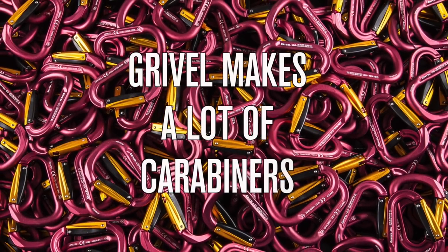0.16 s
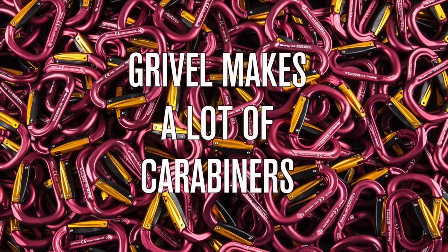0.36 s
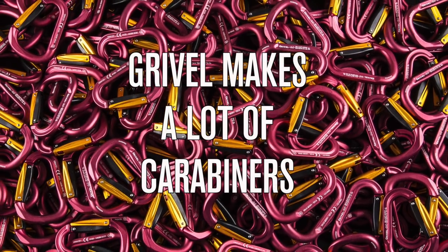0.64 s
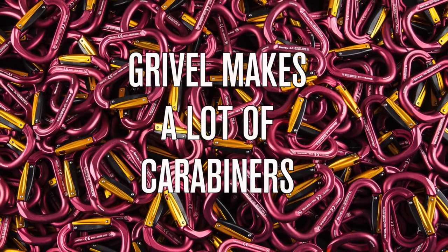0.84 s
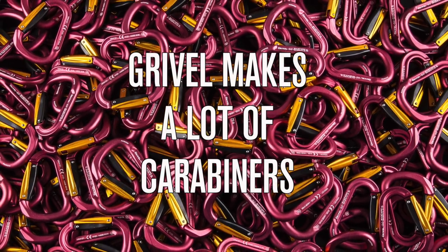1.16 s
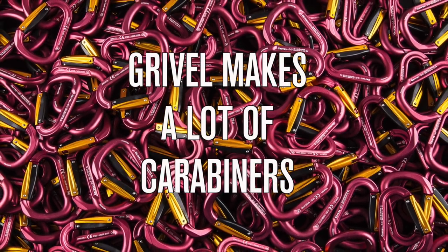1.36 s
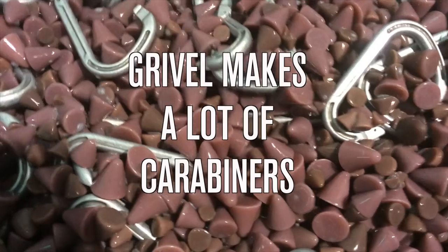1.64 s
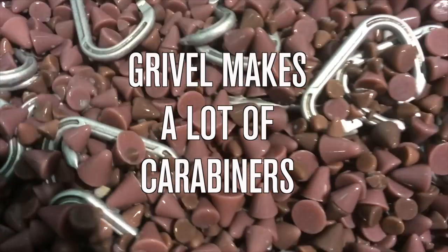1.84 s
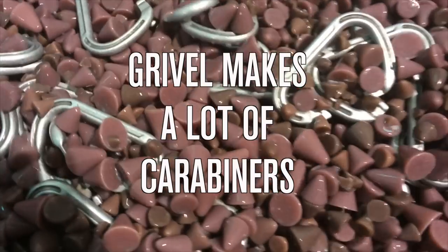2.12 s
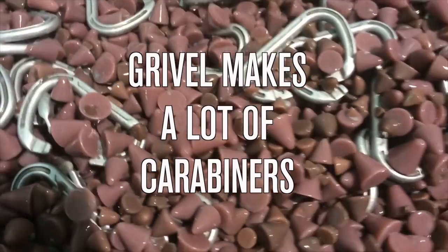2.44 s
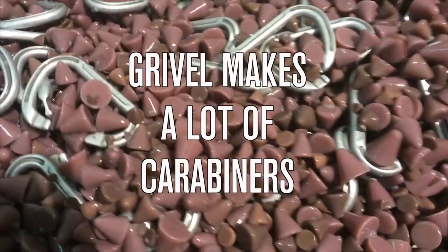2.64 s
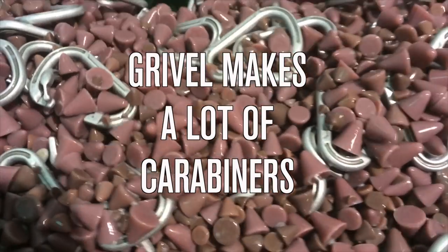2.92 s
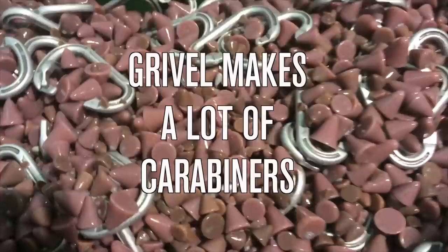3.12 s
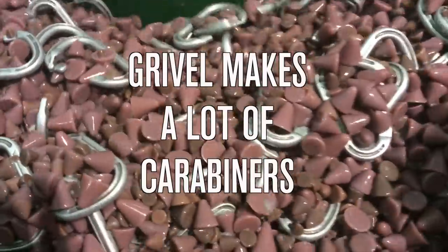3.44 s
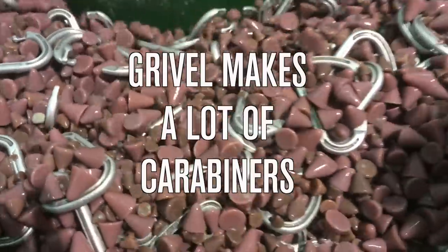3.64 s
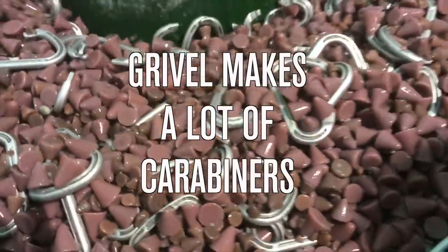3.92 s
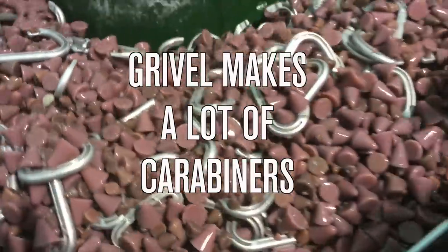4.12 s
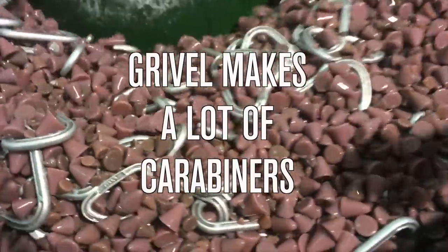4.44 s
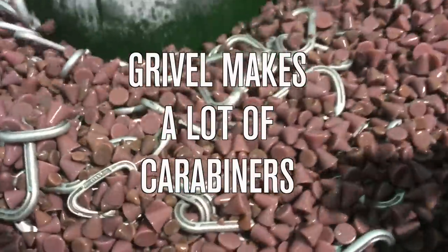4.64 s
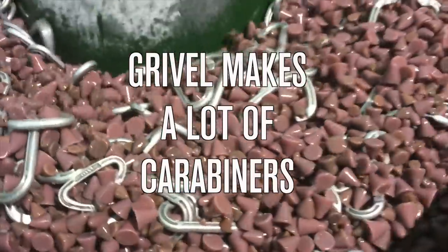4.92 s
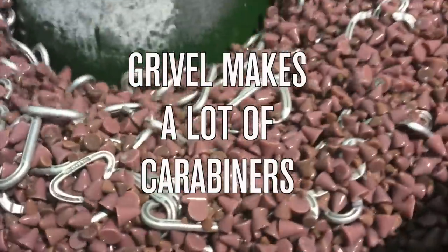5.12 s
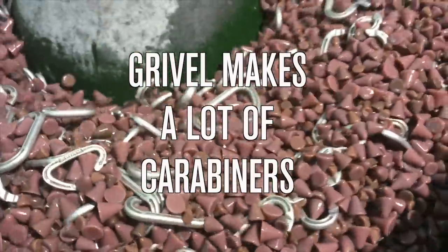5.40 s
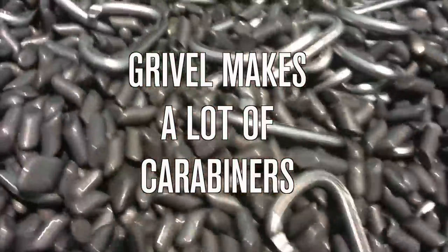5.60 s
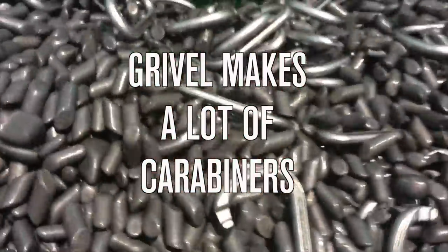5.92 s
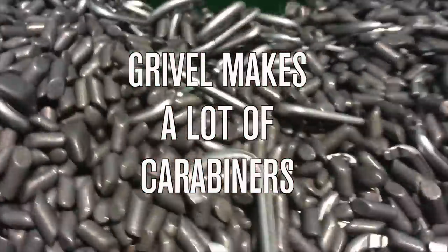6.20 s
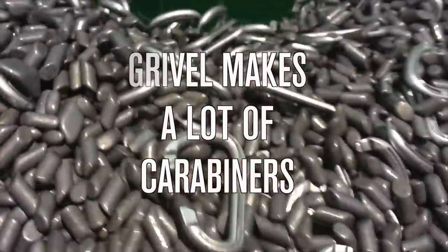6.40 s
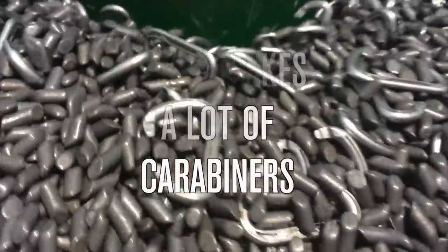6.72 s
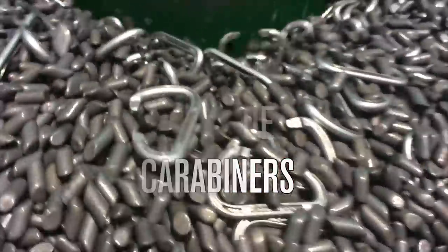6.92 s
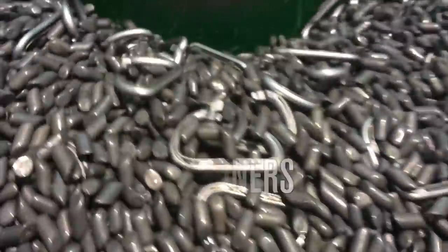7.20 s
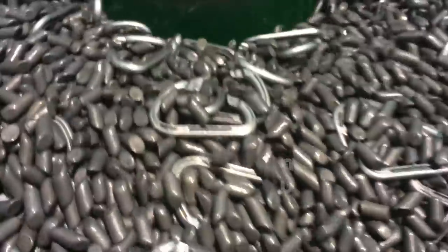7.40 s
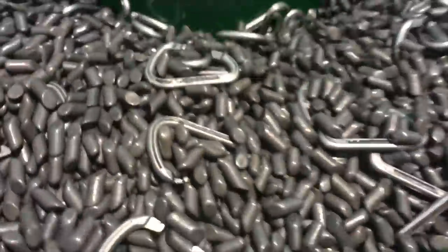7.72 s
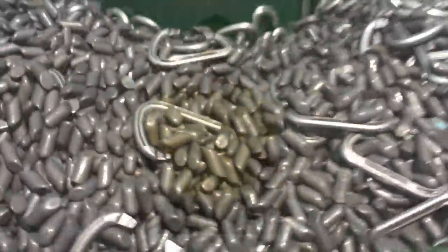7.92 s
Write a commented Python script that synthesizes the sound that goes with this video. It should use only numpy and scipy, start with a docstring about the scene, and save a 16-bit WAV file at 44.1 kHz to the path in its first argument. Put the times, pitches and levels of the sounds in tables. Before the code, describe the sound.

Small stones and aluminium hooks churn in a shaking machine with a dense clattering rush over low droning hum, then a closer, louder, crisper one.

```python
"""A factory hall: two vibratory finishing bowls, heard one after the other on a mono microphone, the second closer.
A spinning eccentric shakes each bowl about twenty times a second: the stone media rattle in a throbbing rush of
clicks, short clacks and noise, and the aluminium hooks among them ring at fixed high modes under random blows.
The first bowl adds a droning frame and a beating hum. Dull bumps near the microphone come with the second,
and filtered noise makes the low rumble of the hall behind both."""
import sys
import numpy as np
from scipy import signal
from scipy.fft import rfft, irfft, next_fast_len
from scipy.io import wavfile
from scipy.ndimage import uniform_filter1d

SR = 44100
rng = np.random.default_rng(int(sys.argv[2]) if len(sys.argv) > 2 else 0)


def transcribe(u):
    """Save the signal u as a 16-bit wav file named by the first command-line argument.

    u: samples, shape (n,) or (channels, n), limited to [-1, 1]; the rate is SR.
    q: integer samples, one column per channel.
    """
    v = np.clip(np.atleast_2d(u).T, -1, 1)
    q = np.round(v * 32767).astype(np.int16)
    wavfile.write(sys.argv[1], SR, q)


N = 355225  # length in samples

# Shake of each bowl. Each row, one a bowl: shakes per second [Hz], time of one loudest moment [s].
SHAKES = [(22.39, .088), (20.205, 5.530)]
# Colour of the rattling media, one list a bowl. Each row: frequency [Hz], level [dB per Hz].
MEDIA_SPECTRA = [
    [(200, -39), (345, -14), (560, -8.5), (800, -5.5), (1450, -4.5), (1680, -2.5), (1950, -6), (2400, -6),
     (3200, -2.5), (4800, -3.5), (7000, -6.5), (9600, -10), (12300, -15), (13300, -17), (15300, -27)],
    [(200, -28), (350, -16), (500, -5.5), (800, -9), (1000, -4.5), (1600, -2.5), (2350, -5.5), (2800, -5),
     (3200, -1.5), (4100, -1.5), (6700, 0), (10300, -4), (12300, -8.5), (14000, -8), (15200, -22)],
]
# Throb of the rush with the shake, one list a bowl; the treble comes as the load lands and slides.
# Each row: frequency [Hz], depth to either side [dB], lag behind the loudest moment [s].
THROBS = [
    [(600, 0.5, 0.012), (1100, 1, -0.026), (2100, 1, 0.011), (2900, 1.06, -0.0071), (5470, 1.47, .002),
     (8700, 1.2, 0.0071), (14000, 0, 0.0064)],
    [(450, 4, 0.0071), (750, -1, 0.0031), (1540, 3, -0.0032), (2220, 1.5, 0.0044), (3320, 2.5, -0.0048),
     (6500, 1.45, 0.0034), (13000, 1.5, .014)],
]
# Level of the media rush: one value a bowl [dB].
RUSH_LEVELS_DB = [-39.5, -37]
# Heaps of media slump and the rush swells or dips briefly. Each row: time [s], change of level [dB].
MEDIA_SLUMPS = [(1.3, 1), (1.88, 3.5), (2.09, 3), (2.26, 3), (2.44, 1), (2.68, 1.5), (3.58, 0.5),
                (3.71, -1.5), (4.68, -3), (6.72, 0), (7.45, 2.5)]
# Mode pitches of the hooks, one list a bowl [Hz].
HOOK_PITCHES_HZ = [
    [1344, 4566, 4846, 7364, 7430, 8170, 8669, 9120, 9670, 10330, 10581, 10950, 11655, 12703, 12790, 13700,
     13920, 14120, 14531, 15269],
    [4260, 4808, 7086, 7322, 9134, 11686, 12596, 13438, 13982, 15261],
]
# The same modes, one list a bowl. Each row: spread of pitch among the hooks [Hz], relative level [dB].
HOOK_MODES = [
    [(5, -11), (30, -4.5), (20, -6.5), (30, 0.5), (30, -2.5), (40, -13.5), (35, -2), (30, -19), (40, -24),
     (40, -27), (80, -10.5), (54, -18), (15, -7), (20, -9.5), (61, -13), (50, -21), (60, -15), (50, -19),
     (50, -11), (40, -16)],
    [(60, -7), (5, -11), (70, -4), (15, -1.5), (55, -3), (35, -4.5), (110, -3.5), (70, -14), (30, -10),
     (50, -24)],
]
# Ring of the hooks as they surface and sink, one list a bowl. Each row: time [s], level [dB].
HOOK_LEVELS = [
    [(0, -46), (.7, -47), (1.7, -44), (2.1, -45), (2.6, -43), (3.2, -47), (3.7, -44), (4.2, -47),
     (5.3, -44.5)],
    [(5.6, -43), (6, -41), (7.2, -43.5), (7.6, -41.5)],
]
# Modes of the first bowl's frame. Each row: frequency [Hz], width of each pass [Hz], relative level [dB].
FRAME_MODES = [(102.3, 8.1, 0.5), (117.9, 16, -3), (174.6, 44, -0.5), (193.6, 14, -7.5)]
# The load lurches and the machine throbs louder, or now and then softer.
# Each row: time [s], swell of the hum [dB], swell of the frame [dB].
LOAD_LURCHES = [(.23, 15, 8.5), (0.679, 8.5, 2), (.84, 10, 6), (.93, 10, 6), (1.05, 7, -1), (1.42, 14, 7.5),
                (2.1, -4, -5), (2.26, 11, 3), (2.4, 7, 5), (2.55, 11, 6), (2.62, 7, 3), (2.829, 7, 4),
                (3.04, 10, 5), (3.281, 7, 1), (3.63, 11, 4), (3.8, 13, 6), (4.07, 12, 8), (4.5, 7, 7),
                (4.68, 7, 8), (4.88, 7, 1), (5.27, 13, 5)]
# Dull bumps near the microphone. Each row: time [s], peak level [dB], frequency [Hz], length [cycles].
MIC_BUMPS = [(5.58, -42, 171, 10), (5.679, -36, 168, 3.7), (5.79, -43, 70, 1.5), (5.873, -36, 450, 0.92),
             (5.93, -45, 190, 2.6), (5.941, -33.5, 590, 1.9), (6.125, -39, 600, 2.4), (6.19, -37, 640, 2.7),
             (6.197, -44, 95, 2.2), (6.2335, -30, 250, 0.35), (6.848, -42, 168, 4.3), (7.151, -48, 90, 2.2),
             (7.26, -49, 110, 4), (7.27, -45, 170, 4), (7.411, -46, 155, 5), (7.511, -48, 166, 5),
             (6.77, -47, 141, 6.1), (7.08, -48, 150, 4), (7.988, -49, 93, 4.4), (7.77, -40, 546, 3.5)]
# Colour of the hall's low rumble. Each row: frequency [Hz], relative level [dB per Hz].
HALL_SPECTRUM = [(15, -55), (25, -15.5), (97, 4), (129, -1.5), (152, 1.5), (188, 0), (226, -3.5), (295, -8),
                 (385, -13), (450, -7.5), (580, -18.5), (990, -120)]
# Level of the low rumble along the take. Each row: time [s], level [dB].
HALL_LEVELS = [(0, -51.5), (5.5, -52), (6.0, -55.5), (6.6, -56.5), (6.9, -57.5), (7.2, -53.5), (7.5, -56),
               (7.65, -58.5), (8.05, -57)]

CHANGE_S, CROSSFADE_S = 5.518, 0.021  # middle and length of the change to the closer bowl
FADE_IN_S, FADE_IN_DB = 0.78, -4  # the sound rises from this much below its level
SLUMP_S, LURCH_S = 0.0076, 0.045  # half lengths of the bell-shaped swells
PART_Q = 240  # ring width = pitch / Q: high modes die sooner
FRAME_DB = -57
JOLT_DB = 25.5  # blow of a lurch on the frame, over its steady push; the frame's swell in dB is added
HUM_HZ, HUM_DB = 71.1, -60.5
BEAT_S, BEAT_LOW_S, BEAT_SHARE = 2.01, 1.57, 0.29  # beat period, one quietest moment, share of the second tone
EDGE_HZ = 15325  # upper band limit


def media(bowl):
    """Dense clicks and clacks over a smooth wash, throbbing with the shake, in drifting patches."""
    wash = evened(rng.standard_normal(N))
    clicks = evened(impacts(count=50000, spread_db=-2.0))
    rattle = evened(wash + amp(-8.5) * clicks + 0) * np.sqrt(np.mean((wash + amp(-8.5) * clicks) ** 2))
    rattle = rattle + amp([-10, -8][bowl]) * evened(clacks())
    hz, t, bands = signal.stft(rattle, SR, nperseg=256, noverlap=192)

    rate, peak_s = SHAKES[bowl]
    lag = read(THROBS[bowl], hz, axis=2)[:, None]
    depth_db = read(THROBS[bowl], hz)[:, None]
    throb_db = depth_db * np.cos(2 * np.pi * rate * (t - peak_s - lag))

    # patches are smoothed over 6 frequency bins, then over 40 frames
    patches = uniform_filter1d(rng.standard_normal(bands.shape), 6, 0)
    patches = evened(uniform_filter1d(patches, 40, 1))
    surge = np.interp(t, np.arange(N) / SR, wander(0.015))  # heaps of media slide together
    bands = bands * amp(throb_db + 0.49 * patches + 0.17 * surge)

    rush = signal.istft(bands, SR, nperseg=256, noverlap=192)[1][:N]
    rush = coloured(rush, MEDIA_SPECTRA[bowl])
    level_db = RUSH_LEVELS_DB[bowl] + bells(MEDIA_SLUMPS, SLUMP_S) + 0.19 * wander(0.082)
    return evened(rush) * amp(level_db)


def clacks():
    """Single stones of many sizes, each a short ring; small stones ring higher and die sooner."""
    total = np.zeros(N)
    for hz in np.geomspace(700, 7000, num=36):
        total += evened(resonate(impacts(count=250, spread_db=-0.5), hz, hz / 24))
    return total


def parts(bowl):
    """Three hooks of slightly different pitch ring under their own blows and swell as they surface and sink."""
    ring = np.zeros(N)
    for hz, (spread, db) in zip(HOOK_PITCHES_HZ[bowl], HOOK_MODES[bowl]):
        surfacing = amp(1.4 * wander(0.37))
        for side in (-.5, 0, .5):
            blows = surfacing * impacts(count=2500, spread_db=3.0) * amp(2.2 * wander(.07))
            ring += amp(db) * evened(resonate(blows, hz + side * spread, hz / PART_Q))
    return evened(ring) * amp(follow(HOOK_LEVELS[bowl]))


def frame():
    """The sprung frame of the first bowl drones at a few low modes, steeper for being coupled twice."""
    push = rng.standard_normal(N)
    for s, _, swell_db in LOAD_LURCHES:
        push[round((s - LURCH_S) * SR)] += amp(JOLT_DB + swell_db)
    drone = np.zeros(N)
    for hz, width, db in FRAME_MODES:
        once = resonate(push, hz, width)
        drone += amp(db) * evened(resonate(once, hz, width))
    return evened(drone) * amp(FRAME_DB + bells(LOAD_LURCHES, LURCH_S, axis=2))


def hum():
    """A near-sine whose pitch drifts a little; it beats slowly like two close tones and swells with each lurch."""
    turns = np.cumsum(HUM_HZ + 2.49 * wander(0.081)) / SR
    beat_turns = (np.arange(N) / SR - BEAT_LOW_S) / BEAT_S
    beat = abs(1 - BEAT_SHARE * np.exp(2j * np.pi * beat_turns))
    level_db = HUM_DB + bells(LOAD_LURCHES, LURCH_S) + 2.0 * wander(0.058)
    return np.sqrt(2) * np.sin(2 * np.pi * turns) * beat * amp(level_db)


def bumps():
    """Dull bumps close to the microphone, each a few cycles under a smooth bell."""
    reach = SR // 20
    out = np.zeros(N)
    for s, db, hz, cycles in MIC_BUMPS:
        turns = np.arange(-reach, reach) / SR * hz
        bell = np.exp(-(3 * turns / cycles) ** 2)
        start = round(s * SR) - reach
        out[start:start + 2 * reach] += amp(db) * np.cos(2 * np.pi * turns) * bell
    return out


def hall():
    """Lumpy low rumble of the workshop: coloured noise of wandering level."""
    rumble = coloured(rng.standard_normal(N), HALL_SPECTRUM)
    return evened(rumble * amp(1.4 * wander(0.036))) * amp(follow(HALL_LEVELS))


def impacts(count, spread_db):
    """Clicks of random sign at random moments; positive spread makes a few large, negative a few faint."""
    place, sign, size = rng.random((count, 3)).T
    out = np.zeros(N)
    out[(place * N).astype(int)] = np.sign(sign - .5) * amp(spread_db * np.minimum(-np.log(size), 4))
    return out


def resonate(x, hz, width):
    """A two-pole mode of peak gain 1; the narrower its width in Hz, the longer it rings."""
    r = np.exp(-np.pi * width / SR)
    poles = [1, -2 * r * np.cos(2 * np.pi * hz / SR), r * r]
    return signal.lfilter([(1 - r * r) / 2, 0, (r * r - 1) / 2], poles, x)


def coloured(x, points):
    """Shapes x by a spectrum in dB."""
    size = next_fast_len(len(x))
    gain = amp(read(points, np.fft.rfftfreq(size, 1 / SR)))
    return irfft(rfft(x, size) * gain, size)[:len(x)]


def wander(seconds):
    """Slow chance of rms 1: noise at every 64th sample, averaged twice over the given time."""
    size = max(round(seconds * SR / 64), 2)
    slow = rng.standard_normal(N // 64 + 2)
    slow = uniform_filter1d(uniform_filter1d(slow, size), size)
    return evened(np.interp(np.arange(N) / 64, np.arange(len(slow)), slow))


def bells(rows, half_s, axis=1):
    """The sum of bell-shaped swells in dB, worked out every 2 ms."""
    t = np.arange(0, N / SR, .002)
    swell_db = sum(row[axis] * np.exp(-((t - row[0]) / half_s) ** 2) for row in rows)
    return np.interp(np.arange(N) / SR, t, swell_db)


def follow(rows, axis=1):
    """One column of a curve in time, at every sample."""
    rows = np.transpose(rows)
    return np.interp(np.arange(N) / SR, rows[0], rows[axis])


def read(points, hz, axis=1):
    """One column of a table on a log-frequency axis."""
    points = np.transpose(points)
    return np.interp(np.log(hz + 1), np.log(points[0] + 1), points[axis])


def amp(db):
    """Amplitude factor of a level in dB."""
    return 10 ** (np.asarray(db) / 20)


def evened(x):
    """Brings x to rms 1."""
    return x / np.sqrt(np.mean(x ** 2) + 1e-20)


def scene():
    """The sound rises, then fades over from the first bowl to the closer one in a few ms."""
    t = np.arange(N) / SR
    second = np.clip((t - CHANGE_S) / CROSSFADE_S + .5, 0, 1)
    first_bowl = media(0) + parts(0) + frame() + hum()
    second_bowl = media(1) + parts(1)
    bowls = np.sqrt(1 - second) * first_bowl + np.sqrt(second) * second_bowl
    mono = bowls + bumps() + hall()
    mono = mono * amp(FADE_IN_DB * np.clip(1 - t / FADE_IN_S, 0, 1))
    return np.array([mono, mono])


def record(dry):
    """The band limit: a steep low-pass on both identical channels."""
    low_pass = signal.firwin(2047, EDGE_HZ, window=("kaiser", 9), fs=SR)
    return signal.oaconvolve(dry, low_pass[None], "same")


dry = scene()
out = record(dry)
transcribe(out)
```